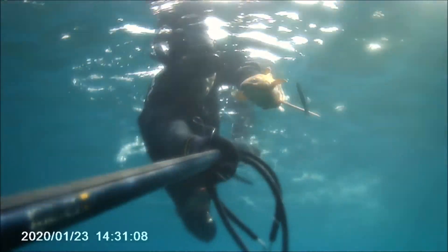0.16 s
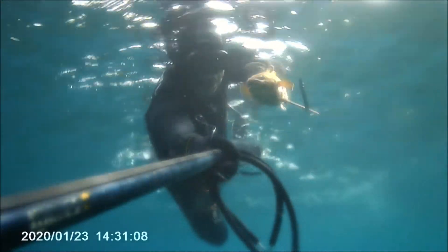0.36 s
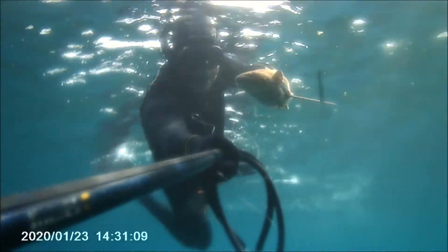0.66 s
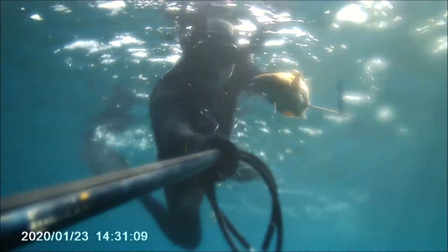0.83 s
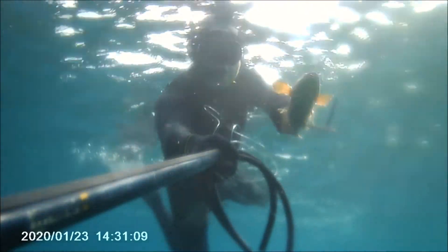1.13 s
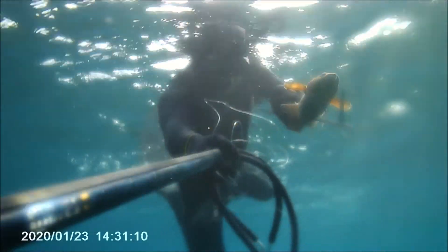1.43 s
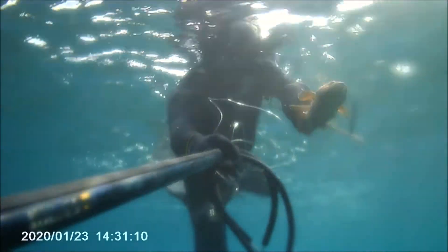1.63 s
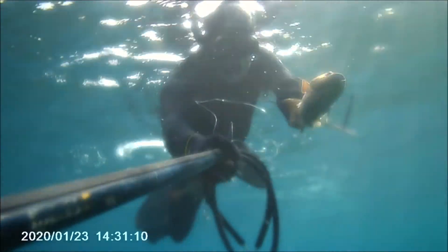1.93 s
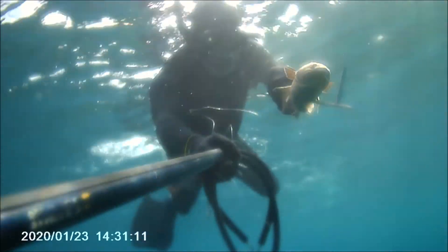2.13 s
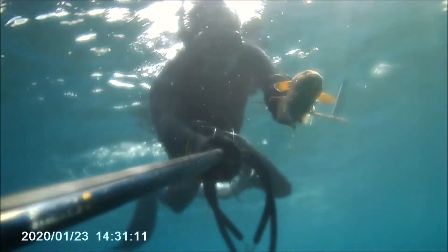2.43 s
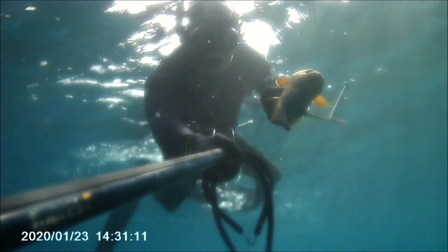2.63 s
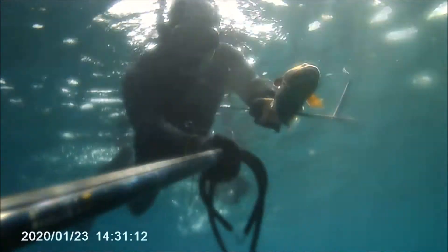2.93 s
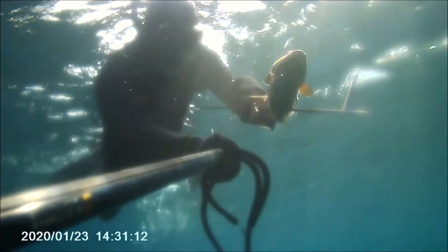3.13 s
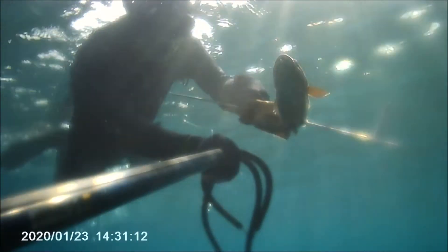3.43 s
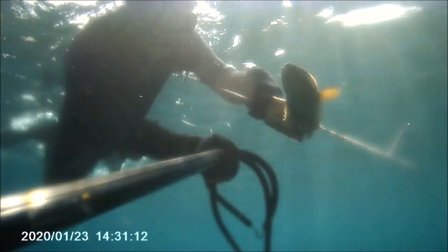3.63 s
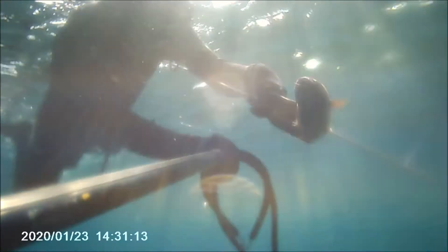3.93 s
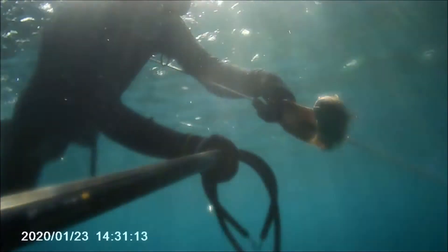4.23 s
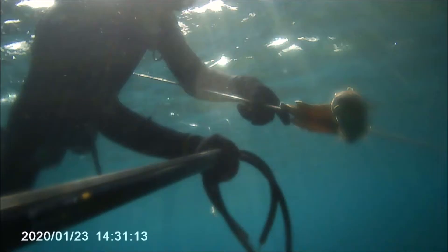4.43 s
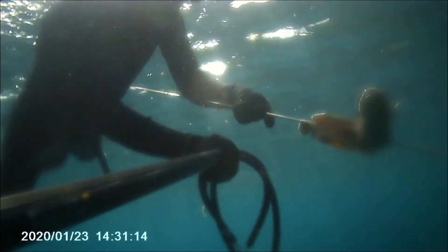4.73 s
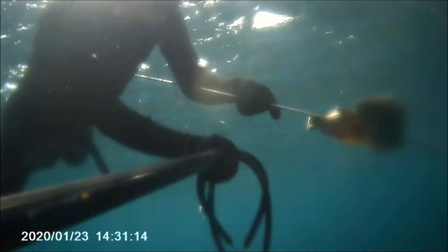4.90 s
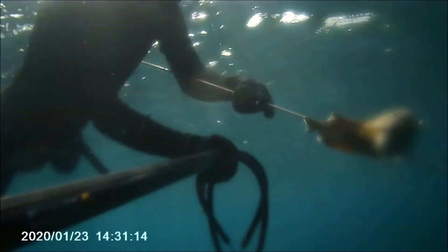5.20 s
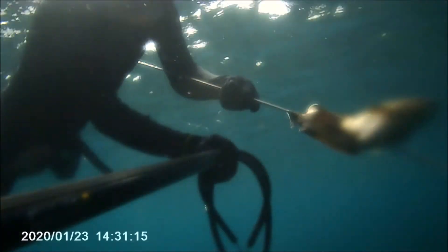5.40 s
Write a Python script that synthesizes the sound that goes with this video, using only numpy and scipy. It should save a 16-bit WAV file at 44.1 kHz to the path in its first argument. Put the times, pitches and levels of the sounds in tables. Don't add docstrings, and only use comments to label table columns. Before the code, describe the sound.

About five and a half seconds under the sea surface, heard from inside a sealed camera housing on a speargun while a diver handles a speared fish. A very low hum around 45 hertz surges and fades several times a second over slow, deep swaying. Loose fittings give dull thuds with short low rattles, firm around 1.2 and 2 seconds, gentler between 3 and 4.5, then strongest at 5.1 and 5.4. Hollow gurgling murmurs in the middle register. Small bubbles blip with slightly rising pitch from 0.1 to 1.6 seconds, once near 3.2, and in clusters from 4.6 onward. Dry shrimp snaps click irregularly throughout, each with a short ringing tail and quick reflection; sharp ones land near 1.9, 3.1, 4.2 and 4.5. Behind them lies faint continuous frying crackle, slight electronic hiss and whine, and momentary thin, whistly treble. The top end is dull.

```python
import sys
import numpy as np
from scipy import signal
from scipy.fft import dct
from scipy.io import wavfile
from scipy.ndimage import uniform_filter1d

SR = 44100
rng = np.random.default_rng(int(sys.argv[2]) if len(sys.argv) > 2 else 0)


def bounce(signal):
    frames = np.transpose(np.atleast_2d(signal))
    limited = np.clip(frames, -1, 1)
    pcm = np.round(limited * 32767).astype(np.int16)
    wavfile.write(sys.argv[1], SR, pcm)


def gain_from_db(level_db):
    decades = np.asarray(level_db, float) / 20
    return 10 ** decades


N = 245195

# centre_hz, width_hz, level_db
CAVITY = [(509, 33, -11.5), (578.2, 52, -1.5), (628, 31, -5.5), (694, 70, -9.5), (828, 160, -24.5),
          (1056, 57, -21)]
# centre_hz, width_hz, level_db
LID = [(1510, 245, 14.8), (1755, 254, 14.5), (1997, 510, 16.3), (2131, 75, 3.4)]
# centre_hz, width_hz, level_db
WINDOW = [(2714, 230, -9), (3190, 370, 2), (3674, 810, -4.5), (4490, 540, -15.5)]
# centre_hz, width_hz, level_db
TOP = [(5683, 940, 4), (6397, 500, 6), (7330, 610, 3.5), (8360, 60, -6), (9100, 790, 2.5), (10300, 160, -9),
       (12100, 5400, -19.5), (13600, 1500, -37.5)]


def noise():
    return rng.standard_normal(N)


def unit(x):
    return x / np.sqrt(np.mean(x ** 2))


def curves(table):
    s, *columns = np.transpose(table)
    return [np.interp(np.arange(N) / SR, s, column) for column in columns]


def flicker(rate_hz, depth_db):
    k = int(SR / rate_hz)
    held = np.repeat(rng.standard_normal(N // k + 1), k)[:N]
    smooth = uniform_filter1d(uniform_filter1d(held, k), k)
    return gain_from_db(depth_db * unit(smooth))


def ring(x, modes, order=1):
    out = 0
    for k, (hz, width_hz, db) in enumerate(modes):
        band = [hz - width_hz / 2, hz + width_hz / 2]
        sos = signal.butter(order, band, "band", fs=SR, output="sos")
        out = out + (-1) ** k * gain_from_db(db) * signal.sosfilt(sos, x)
    return out


def bursts(s, db, t60_s):
    at = np.clip((np.asarray(s) * SR).astype(int), 0, N - 1)
    kicks = np.bincount(at, gain_from_db(db), N)
    return signal.lfilter([1], [1, -1000 ** (-1 / (t60_s * SR))], kicks)


def swells(s, db, rise_db_s, fall_db_s, hold_s=0):
    late = np.arange(N) / SR - np.asarray(s)[:, None]
    rise_loss = rise_db_s * np.maximum(-late, 0)
    fall_loss = fall_db_s * np.maximum(late - np.reshape(hold_s, (-1, 1)), 0)
    return gain_from_db(np.asarray(db)[:, None] - rise_loss - fall_loss)


def ping(s, db, hz, t60_s, glide):
    out, t = np.zeros(N + SR), np.arange(SR // 4) / SR
    for at, gain, f, fade, bend in np.broadcast(s, gain_from_db(db), hz, t60_s, glide):
        start = int(at * SR)
        shape = (1 - np.exp(-t / 0.002)) * 1000 ** (-t / fade)
        out[start:start + len(t)] += gain * shape * np.sin(2 * np.pi * f * t * (1 + bend * t))
    return out[:N]


def barrel():
    # peak_s, level_db, pitch_hz, hold_s
    surges = [(0.087, -25.5, 44.65, 0.18), (0.559, -19, 43.1, 0.06), (0.762, -25, 42.8, 0.11),
              (1.052, -17, 46, 0.029), (1.304, -18, 46.78, 0.022), (1.432, -25.5, 44.25, 0.01),
              (1.739, -21, 47.38, 0.02), (2.083, -23, 46, 0.047), (2.21, -33.5, 45.12, 0.22),
              (2.52, -23.5, 44.87, 0.0079), (2.692, -19, 45.16, 0.016), (3.035, -29.5, 41.27, 0.043),
              (3.255, -30, 42.95, 0.066), (3.651, -24.5, 44.63, .03), (3.735, -18, 44.78, 0.036),
              (3.992, -28.5, 45.8, 0.052), (4.22, -39.5, 46.82, 0.13), (4.58, -30, 47.82, 0.018),
              (4.814, -16.5, 42.89, 0.084), (4.976, -25.5, 40.66, 0.037), (5.183, -29, 40.8, 0.014),
              (5.426, -18.5, 47.2, 0.033)]
    # time_s, level_db
    sway_levels = [(0.0, -7.5), (0.08, -19.5), (0.73, -25), (1.19, -19.5), (1.41, -28.5), (1.5, -22),
                   (1.75, -28), (1.83, -11.5), (2.04, -14.5), (2.18, -27), (2.46, -19.5), (4.41, -23.5),
                   (4.61, -14.5), (4.8, -46.5), (5.2, -9), (5.36, -32.5), (5.56, -27.5)]
    s, db, pitch_hz, hold_s = np.transpose(surges)
    power = swells(s, db, 206, 108, hold_s) ** 2
    level = np.sqrt(power.sum(axis=0)) + gain_from_db(-44.5)
    hz = pitch_hz @ power / power.sum(axis=0)
    hum = np.sqrt(2) * np.sin(2 * np.pi * np.cumsum(hz * flicker(14, 0.2485)) / SR)
    eddies = unit(ring(noise(), [(30.2, 16.7, -2.5), (46, 13.3, 5.5), (58.2, 20, -7.5)], order=2))
    sway = unit(ring(noise(), [(4.21, 4.91, -3.5), (9.92, 4.24, 2), (23.2, 12.96, -15.5)]))
    return level * (hum + gain_from_db(-9) * eddies) + gain_from_db(curves(sway_levels)[0]) * sway


def fittings():
    # start_s, peak_db, upper_modes_db, shaking_db
    knocks = [(0.092, -32, -20, -48), (0.44, -40, 4.5, -50), (0.513, -34.5, -17, -49),
              (0.85, -58, -12, -52), (0.957, -28.5, -11, -32.5), (1.212, -22, -10, -30.5),
              (1.476, -28.5, -11, -34), (1.685, -57, -15, -33), (1.956, -26, -17, -36.5),
              (2.057, -26.5, 10.5, -31), (2.12, -36, -21, -45), (2.277, -30, -18, -40),
              (2.45, -27.5, -31, -35.5), (2.715, -34.5, -15, -42), (2.967, -38.5, -26, -57),
              (3.08, -64, -14, -50), (3.182, -35.5, 0, -42), (3.535, -34, -20, -48),
              (3.598, -28, -19, -40.5), (3.689, -34, -8, -32.5), (4.02, -43.5, -8, -45.5),
              (4.37, -44, -15, -40.5), (4.497, -42.5, 6, -36), (4.649, -24, -2.5, -57),
              (4.771, -25, -27, -38), (4.853, -28.5, 3.5, -33), (4.913, -45, -3, -31.5),
              (5.113, -20, -16, -25.5), (5.373, -18, -3, -30.5)]
    # time_s, level_db
    current = [(0, -58), (.6, -46), (1.1, -41), (1.7, -59), (2.15, -36), (2.9, -65), (3.3, -53.5),
               (3.75, -41), (4.2, -58), (4.93, -34), (5.2, -54.5), (5.56, -54)]
    # centre_hz, width_hz, level_db
    low_modes = [(87, 29, -8), (130.2, 16.3, 0), (155.24, 14.4, -3), (172.5, 7.9, 0)]
    high_modes = [(218.9, 20, 9.5), (268.7, 37, -3.5)]
    # centre_hz, width_hz, level_db
    thud_modes = [(162, 66, 3.5), (245, 116, -11)]
    s, db, upper_db, shake_db = np.transpose(knocks)
    shaking = swells(s, shake_db, 890, 172).max(axis=0)
    buffet = shaking + gain_from_db(curves(current)[0])
    jostle = buffet * gain_from_db(-4.5) * flicker(25, 3.9)
    low = unit(ring(noise(), low_modes, order=2)) * jostle
    high = unit(ring(noise(), high_modes, order=2)) * jostle * gain_from_db(-9.5)
    rattle = 1 + 0.52 * noise()
    low_knock = gain_from_db(-2) * 10 * ring(bursts(s, db, 0.014) * rattle, low_modes)
    high_knock = gain_from_db(-15.5) * 10 * ring(bursts(s, db + upper_db, 0.031) * rattle, high_modes)
    thud = gain_from_db(6) * ring(bursts(s, db, 0.012), thud_modes, order=2)
    return low + high + low_knock + thud + high_knock


def snaps():
    # start_s, peak_db, lean_from_window_to_lid_db, brightness_db
    near = [(0.0514, -30.5, 3.5, -15), (0.1564, -38, -6, 0.5), (.276, -33, 1, -19.5),
            (0.32, -24.5, -2.5, -24.5), (0.3838, -22.5, 1, -16.5), (0.548, -29.5, 2, -35),
            (0.8467, -25, 6, -24), (0.8573, -27, 2, -21), (0.9574, -29.5, 0.5, -45),
            (1.1614, -28.5, 9, -18), (1.3123, -24, -2, -35), (1.5402, -30, 2, -19), (1.91, -20, 1.5, -24),
            (2.02, -28.5, -4.5, -16), (2.3308, -31.5, 0, -16), (2.533, -30.5, -1, -16.5),
            (2.601, -26, -3.5, -15.5), (2.6981, -23, 4, -23), (2.771, -27, 0, -24), (2.8335, -25, 3, -26.5),
            (2.9634, -30.5, -2.5, -21), (3.1057, -18.5, 2.5, -24.5), (3.762, -27, 2, -23),
            (4.1809, -20, 1.5, -20), (4.2474, -25.5, 8, -19), (4.3226, -33, -4, -21),
            (4.5043, -17, -1.5, -32), (4.791, -24, -2.5, -17.5), (5.0697, -28.5, 8, -43),
            (5.2848, -23.5, 7, -12.5)]
    # start_s, peak_db, lean_from_window_to_lid_db
    middle = [(.194, -34.5, -3.5), (0.483, -36.5, 0), (.5, -37.5, 9), (.596, -39, -4), (0.8887, -35.5, 4),
              (1.002, -37, 4), (1.215, -34, 1), (1.297, -38, 0), (1.7192, -37, 5), (1.747, -45, -9),
              (1.9793, -34, 2), (2.2361, -35.5, 0), (2.726, -32.5, 4), (2.821, -39, -8), (2.873, -39, 1),
              (3.5954, -35, -5), (3.6357, -35, 0), (3.6793, -36, 4), (3.8881, -34.5, 1.5), (4.0189, -32, 3),
              (4.0918, -41.5, 13), (4.157, -30, 2.5), (4.632, -30.5, 3), (4.8946, -36, 1.5),
              (4.9457, -35.5, -5), (4.9919, -33.5, -4), (5.014, -32.5, 0.5), (5.123, -34.5, -3),
              (5.2672, -32.5, -3), (5.4279, -37, -6)]
    # centre_hz, width_hz, level_db
    frame = [(1035, 360, -0.5), (4830, 1300, -16)]
    middle_bright_db = np.full(len(middle), -15)
    s, db, lean, bright = np.vstack([near, np.column_stack([middle, middle_bright_db])]).T

    late, loss = rng.standard_normal((len(s), 2)).T
    echo_s, echo_db = s + 0.012 + 0.0037 * late, db - 11.5 + 3.0 * loss
    s, db = np.r_[s, echo_s], np.r_[db, echo_db]
    lean, bright = np.tile(lean, 2), np.tile(bright, 2)

    panel_db = -9
    shares = [-14 + 0.72 * lean, panel_db + lean, panel_db - lean, bright]
    parts = [(CAVITY, 3, 0.1), (LID, 3, 0.09), (WINDOW, 3, 0.1), (TOP, 3, 0.06)]  # modes, dB, tail t60 s
    out = gain_from_db(-22) * 10 * ring(bursts(s, db, 0.016) * noise(), frame)
    for share_db, (modes, part_db, tail_s) in zip(shares, parts):
        level_db = db + share_db
        crack = bursts(s, level_db + 16.5, 0.00019)
        echoes = bursts(s, level_db, 0.025) + gain_from_db(-11.5) * bursts(s, level_db, tail_s)
        gain = 1 / np.std(ring(noise(), modes))
        out = out + gain_from_db(part_db - 13.5) * gain * ring(crack + echoes * noise(), modes, order=2)
    return out


def bubbles():
    # start_s, peak_db, pitch_hz, t60_s
    bubble_events = [(0.1, -24, 570, 0.097), (0.26, -33.5, 380, 0.14), (0.7, -35.5, 590, 0.058),
                     (1.082, -26.5, 579, 0.16), (1.31, -34, 1128, 0.034), (1.429, -35, 574, 0.15),
                     (1.576, -39, 519, 0.29), (1.621, -31.5, 607, 0.068), (3.168, -30, 474, 0.11),
                     (4.631, -31.5, 629.7, 0.069), (4.75, -43, 630, 0.11), (4.588, -36.5, 604, 0.076),
                     (4.851, -35, 621, 0.039), (5.272, -37.5, 405, 0.11), (5.285, -29.5, 625, 0.082),
                     (5.378, -32, 536, 0.064), (5.463, -47.5, 417.8, 0.4)]
    return ping(*np.transpose(bubble_events), 0.31)


def cavity():
    # time_s, level_db, share_of_deep_gurgles_db
    murmur = [(0.0, -63, 14), (0.11, -45, -4), (0.4, -53, -4.5), (0.66, -58.5, -3.5), (0.8, -52, -3.5),
              (1.08, -46, -5), (1.35, -50.5, -2), (1.7, -55.5, -3), (2.33, -48.5, -19), (2.42, -61.5, 2.5),
              (2.8, -50.5, -6), (3.4, -51, 1.5), (3.72, -59.5, 0), (4.35, -60.5, -4.5), (4.62, -48.5, -0.5),
              (4.99, -71, 1), (5.1, -46.5, -17), (5.56, -55, 5)]
    # centre_hz, width_hz, level_db
    deep_modes = [(309, 71, -1), (380, 31, -1), (456, 76, 3.5)]
    murmur_db, low_db = curves(murmur)
    s, size = rng.random((400, 2)).T
    gurgle = unit(unit(bursts(s * N / SR, 23.0 * size, 0.12)) + 0.25)
    low = gain_from_db(low_db) * flicker(5.5, 3.8) * unit(ring(gurgle * noise(), deep_modes, order=2))
    size, pitch, bend = rng.standard_normal((110, 3)).T
    strand_hz = 584.8 * np.exp(0.0693 * pitch)
    strands = ping(rng.random(110) * N / SR, 3.2 * size, strand_hz, 0.14, 0.53 + 0.8 * bend)
    air = unit(ring(gurgle * noise(), CAVITY, order=2)) + gain_from_db(-3.5) * unit(strands)
    return (air + low) * gain_from_db(murmur_db - 4.5)


def crackle(far_db):
    # centre_hz, width_hz, level_db
    open_paths = [(1080, 300, 0.5), (5040, 1400, -3.5), (11200, 12000, -17)]
    s, size, *shares = rng.random((1100, 6)).T
    parts = [(LID, -2, 0.3), (WINDOW, -2, 0.5), (TOP, -10, 0.9), (open_paths, -13, 0.25)]  # modes, dB, blur
    out = 0
    for share, (modes, db, blur) in zip(shares, parts):
        snap_db = np.minimum(-4.5 * np.log(size), 17) + 10.0 * share
        fry = unit(bursts(s * N / SR, snap_db, 0.036))
        hiss = (fry + blur) * flicker(12, 1.95) * noise()
        out = out + gain_from_db(db) * unit(ring(hiss, modes, order=2))
    return gain_from_db(far_db) * out


def thin_treble(x):
    # start_s, length_s, change_of_top_db, change_of_upper_middle_db
    moments = [(0.294, 0.023, -14, -0.5), (0.435, 0.0063, -20, -8), (0.49, 0.012, -22, -15),
               (0.706, 0.014, -4, 1), (0.853, 0.016, -25, 7), (1.513, 0.028, -23, 4),
               (1.566, 0.021, -2, 14), (1.593, 0.022, -19, 12), (2.412, 0.021, -15, -6),
               (2.734, 0.021, -19, -4), (3.049, 0.016, -25, 2), (3.129, 0.025, -16, -7),
               (3.311, 0.033, -27, -23), (3.408, 0.0084, -15, 1), (3.478, 0.026, -19, -1),
               (3.522, 0.017, -5, 11), (3.699, 0.015, -19, 5), (4.054, 0.021, -20, -8),
               (4.139, 0.017, -22, 4), (4.466, 0.015, -14, -27), (4.846, 0.018, -17, -15),
               (5.024, 0.022, 8, 4), (5.049, 0.019, -7, 2), (5.177, 0.012, 11, -11), (5.32, 0.02, 3, -15)]
    treble = signal.sosfiltfilt(signal.butter(4, 900, "high", fs=SR, output="sos"), x)
    out = x.copy()
    for s, length_s, top_db, middle_db in moments:
        a, n = int((s - 0.006) * SR), int((length_s + 0.015) * SR)
        lines = dct(treble[a:a + n], norm="ortho")
        hz = np.arange(n) * SR / (2 * n)
        rank = np.abs(lines) * (hz / 3000 + 0.06) ** 1.1
        kept_share = np.clip(0.045 * gain_from_db(middle_db / 2), 0.002, 0.5)
        strong = rank > np.quantile(rank, 1 - kept_share)
        kept = lines * np.where(strong, 1.3, gain_from_db(top_db - 5))
        change = dct(kept, type=3, norm="ortho") - treble[a:a + n]
        out[a:a + n] += signal.windows.tukey(n, 0.8) * change
    return out


def scene():
    return (barrel() + fittings() + bubbles() + cavity() + snaps() + crackle(-59))[None]


def roll_off(x):
    return signal.sosfilt(signal.butter(12, 15640, fs=SR, output="sos"), x)


def record(dry):
    # centre_hz, width_hz, level_db
    whine = [(9375, 11, 0), (8900, 11, -3), (9850, 11, -6), (9950, 11, -8)]
    x = dry[0] + gain_from_db(-80) * unit(ring(noise(), whine)) + gain_from_db(-71) * noise()
    x = thin_treble(np.tanh(1.142 * x) / 1.062) - 0.0077
    x = signal.sosfilt(signal.cheby1(6, 0.3, 14300, fs=SR, output="sos"), x)
    return roll_off(x[None])


dry = scene()
out = record(dry)
bounce(out)
```